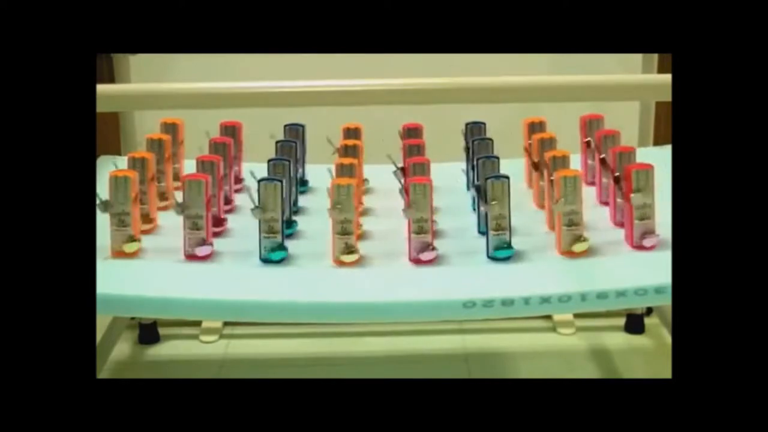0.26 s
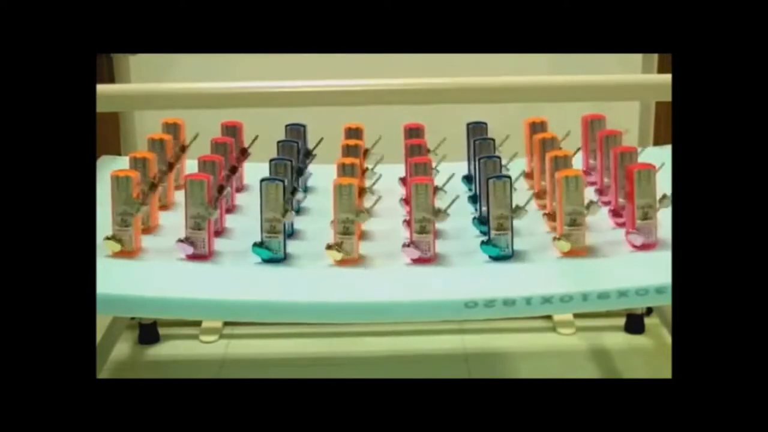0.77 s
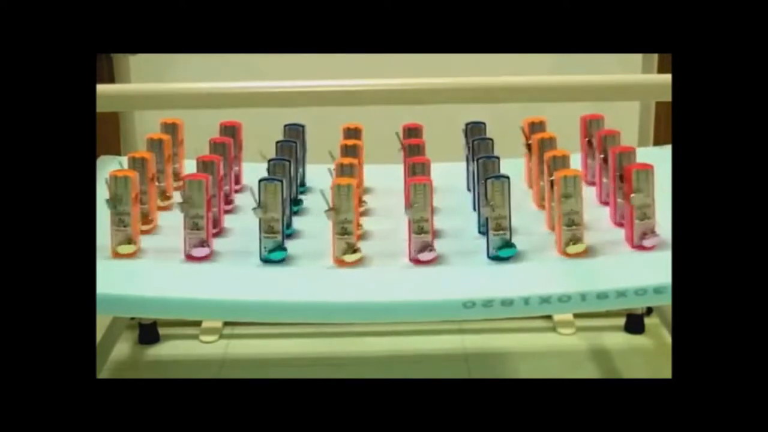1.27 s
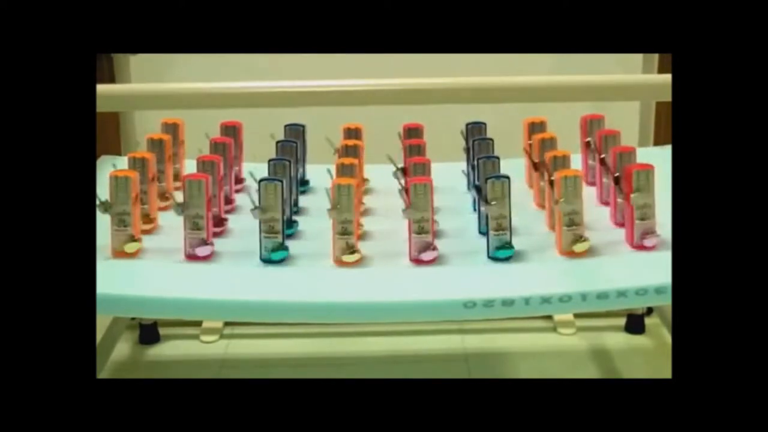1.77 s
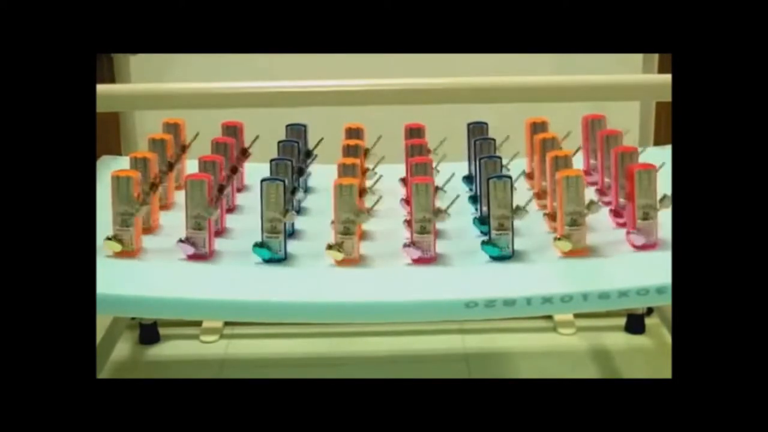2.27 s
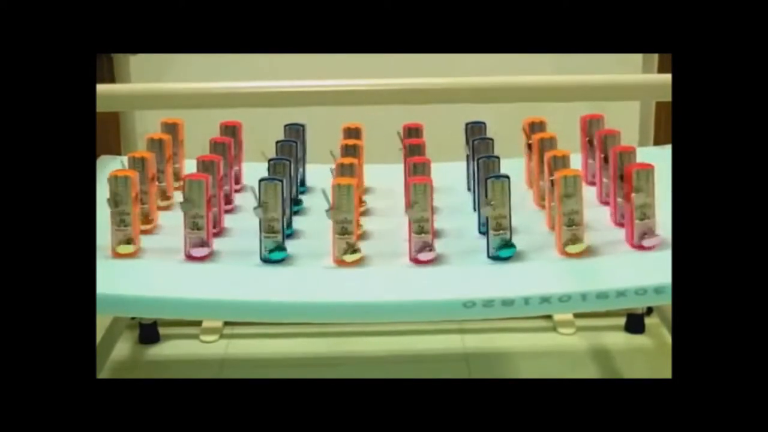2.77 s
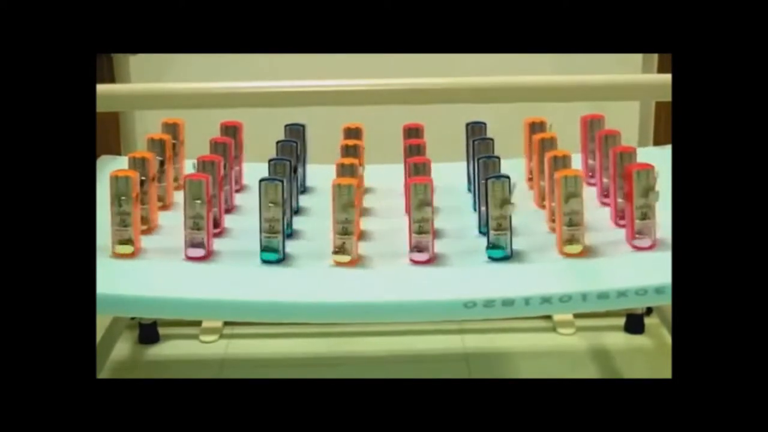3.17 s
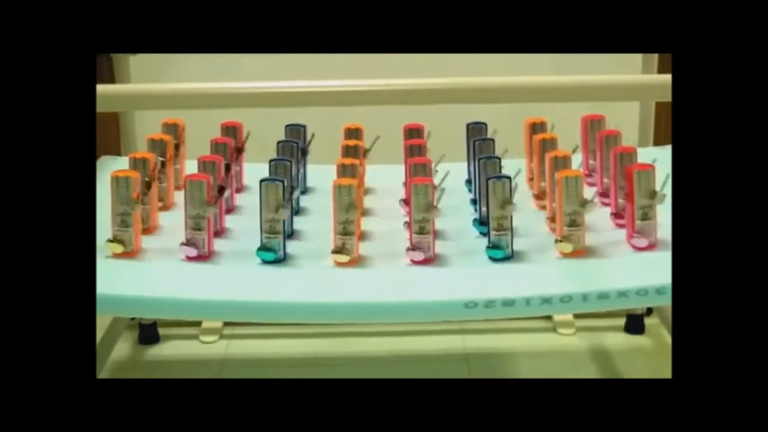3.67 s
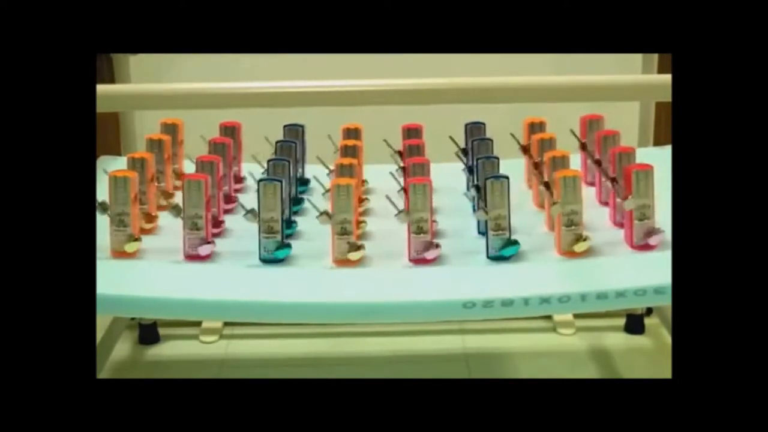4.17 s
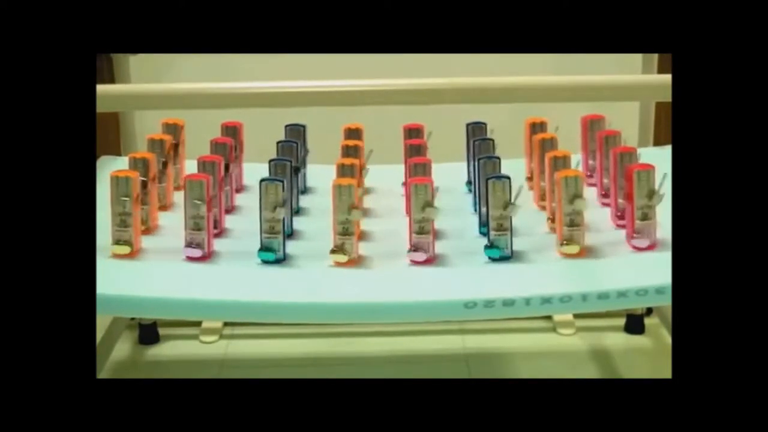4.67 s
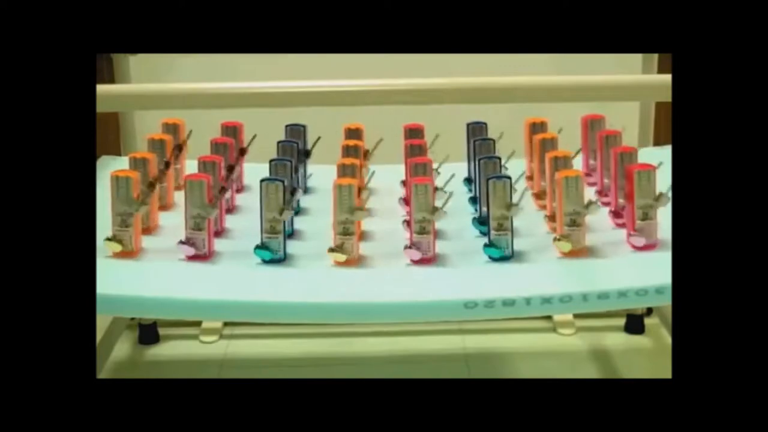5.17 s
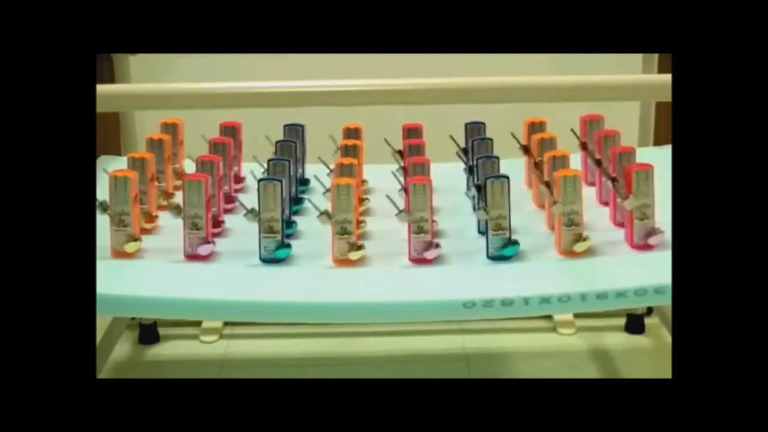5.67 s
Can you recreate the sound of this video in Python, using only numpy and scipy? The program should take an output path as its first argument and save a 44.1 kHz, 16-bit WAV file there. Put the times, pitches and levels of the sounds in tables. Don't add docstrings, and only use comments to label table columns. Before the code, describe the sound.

The tail of an earlier beat and quiet room hiss open the sound, then at about 0.08 seconds a dry crack leads a dense burst of plastic ticking. Thirty-two metronomes follow one another within roughly a tenth of a second, like a handful of hard pellets rattling. The next burst comes near 0.44, then 0.83 and 1.19, continuing evenly about every 0.37 seconds to the end near 6 seconds. Outward swings start with a clearer snap; return swings begin more softly and spread slightly later. Each burst mixes bright crackle, hollow nasal case ringing around 1.9 kHz, a light board thump and low hum from the supports. Small-room reverberation fills the gaps without quite dying away. Faint stray ticks appear near 0.6, 2.7, 3.4 and 4.4 seconds. The camera microphone sound is moderately wide, with dulled top end and slightly grainy, smeared attacks.

```python
import sys
import numpy as np
from scipy import signal
from scipy.io import wavfile

SR = 44100
rng = np.random.default_rng(int(sys.argv[2]) if len(sys.argv) > 2 else 0)


def elevation(decibels):
    levels = np.asarray(decibels, float)
    return 10 ** (levels / 20)


def transcribe(signal):
    frames = np.atleast_2d(signal).T
    limited = np.clip(frames, -1, 1)
    pcm = np.round(limited * 32767).astype(np.int16)
    wavfile.write(sys.argv[1], SR, pcm)


N = 261513
LEAD = 22050


def evened(x):
    return x / np.sqrt(np.mean(x ** 2) + 1e-20)


def read(points, hz):
    f, value = np.transpose(points)
    return np.interp(np.log(hz + 1), np.log(f + 1), value)


def colour(x, points):
    log_gain = np.log(elevation(read(points, abs(np.fft.fftfreq(4096, 1 / SR)))))
    taps = np.fft.ifft(np.exp(np.conj(signal.hilbert(log_gain)))).real[:2048]
    taps = taps.reshape((1,) * (x.ndim - 1) + (-1,))
    return signal.oaconvolve(x, taps, axes=-1)[..., :x.shape[-1]]


# f/Hz, level per Hz/dB
AIR_COLOUR = [(20, -14), (50, -10), (90, -14.5), (140, -9), (300, -10), (450, -6), (1700, -14), (1870, 1.5),
              (2080, -9), (8000, -20), (11300, -33), (12500, -96.5)]


def air():
    return elevation(-44) * evened(colour(rng.standard_normal((2, N)), AIR_COLOUR))


def swings(leads, followers, rear, hollow_db):
    rear_units = 12
    wobble_ms, uneven_db, uneven_hollow_db = 1.2, 1.5, 1.5
    s, lead_db, spread, crowd_db, crowd_ring_db = np.transpose(leads)[:, :, None]
    first_ms, last_ms, rear_db, rear_ring_db = rear
    slot = (np.arange(rear_units) + rng.random(rear_units)) / rear_units
    hidden = [(first_ms + (last_ms - first_ms) * u, 0, rear_db, rear_ring_db) for u in slot]
    lag_ms, drift, db, ring_db = np.transpose(followers + hidden)
    a, b, c = rng.standard_normal((3, len(leads), len(db)))
    late = (spread * (lag_ms + drift * (s - N / SR / 2)) + wobble_ms * a) / 1000
    crowd_level = db + crowd_db + uneven_db * b
    crowd_hollow = ring_db + crowd_ring_db + uneven_hollow_db * c
    crowd = np.reshape([s + late, crowd_level, crowd_hollow], (3, -1)).T
    leader = np.hstack([s, lead_db, 0 * s + hollow_db])
    return np.vstack([leader, crowd])


# t/s, crack level/dB, crowd's lag stretch (1 = usual),
# crowd level/dB, crowd's hollow ring/dB
LEADS_OUT = [
    (0.0826, -9.5, 1.055, .1, -3),
    (0.8318, -7, 1.055, -1.5, 0.4),
    (1.579, -9, 1.005, -0.75, -0.3),
    (2.3272, -7.5, 1.046, -0.9, -1.5),
    (3.0756, -7, 0.99, -1, 0.4),
    (3.8228, -9, 1.01, -1.15, -0.1),
    (4.5707, -10.5, 1.04, -1.1, -0.3),
    (5.3181, -9.5, 1.044, -1.05, -0.7),
]
LEADS_BACK = [
    (0.437, -10, 0.97, -0.4, 0.2),
    (1.1866, -10, 0.97, -0.6, 0.6),
    (1.9351, -12, 0.93, 0, -0.5),
    (2.6825, -13.5, 0.96, -0.5, -0.5),
    (3.4284, -13, 1.025, -0.5, -1.3),
    (4.1758, -10.5, .99, -0.5, -1),
    (4.9248, -10.5, .99, -0.9, 0.5),
    (5.6738, -11.5, 0.99, -0.7, -0.4),
]
# lag/ms, lag drift/(ms per s), crack level/dB, hollow ring over crack/dB
CROWD_OUT = [(6.514, -0.54, -9.5, -8), (17.35, -.5, -10.5, 1), (20.77, -.3, -26.5, 22),
             (26.17, -.3, -12.5, -1.5), (33.1, -.2, -10, -11.5), (41, .3, -16.5, 1), (45.9, -.1, -11, 8),
             (52.2, -.1, -15, 6.5), (58.14, 0.061, -22, 12.5), (63.4, .2, -12, 4), (69.5, -.1, -21, 3.5),
             (74.85, -0.14, -15, -1.5), (88, -0.59, -24, -2), (96, .3, -19, -3.5), (103, -0.36, -20.5, 7),
             (112, -.1, -25.5, -3), (121.7, -0.057, -28.5, -12), (131, -.1, -32, 1.5),
             (146, 0.14, -39.5, -12)]
CROWD_BACK = [(11.6, -.5, -21.5, 1.5), (19.45, -.2, -12.5, -2), (26.44, -.3, -14, 0), (33.38, .1, -8.5, -6),
              (38.8, -.2, -12, 2), (49.4, 0.26, -15, 7), (55.6, .5, -13, 3.5), (62.14, -.1, -13.5, -1),
              (71.3, .1, -13.5, 6), (78, 0.11, -17, 1), (85.4, -0.15, -13, 5), (90.2, .1, -19, -1.5),
              (96, 0.0052, -12, 1), (103, -.1, -22.5, 9.5), (109, -0.53, -23.5, -8.5), (118, 0.27, -32, -3),
              (131.5, 0.21, -27, -24), (149, 0.037, -36, -2.5), (152, 0.21, -38, -1.5)]
# first lag/ms, last lag/ms, crack level/dB, hollow ring/dB
REAR_ROWS_OUT = (10, 82, -18.5, 2)
REAR_ROWS_BACK = (24, 108, -18.5, 2.5)
# out/dB, back/dB
LEADER_HOLLOW = (-1.6, -7.5)
# t/s, crack level/dB, hollow ring over crack/dB
STRAY_TICKS = [
    (2.672, -27, -4),
    (3.4125, -29, -6),
    (4.396, -34, 0),
    (.606, -32, 0),
]


def all_ticks():
    cycle_s = 0.749
    out = swings(LEADS_OUT, CROWD_OUT, REAR_ROWS_OUT, LEADER_HOLLOW[0])
    back = swings(LEADS_BACK, CROWD_BACK, REAR_ROWS_BACK, LEADER_HOLLOW[1])
    earlier = back[back[:, 0] < cycle_s] - [cycle_s, 0, 0]
    return np.vstack([out, back, earlier, STRAY_TICKS])


def escapement(t, leading):
    grains = elevation(2.2 * rng.standard_normal(len(t) // 10).repeat(10))
    rattle_db = -6 - 4 * leading
    snap = elevation(-0.5 - 60 * t / 0.0052)
    tail = elevation(-60 * t / 0.027)
    rattle = elevation(rattle_db - 60 * t / 0.16)
    rise = np.minimum(t / 0.0009, 1)
    return rng.standard_normal(len(t)) * grains * (snap + tail + rattle) * rise


def ring(modes, t, detune, vary_db, rise):
    hz, db, t60 = np.transpose(modes)[:, :, None]
    a, b, phase = rng.standard_normal((3, len(modes), 1))
    level = elevation(db + vary_db * b - 60 * t / t60)
    waves = level * np.sin(2 * np.pi * hz * (1 + detune * a) * t + phase)
    return waves.sum(0) * (1 - np.exp(-t / rise))


# f/Hz, level/dB, t60/s
CASE_WALLS = [(2675, 0, 0.037), (2995, 0, 0.032), (3903, -0.5, 0.029), (5160, -25, 0.0033),
              (5796, -1, 0.036), (7100, -5.5, 0.0023), (8300, -47, 0.0021)]
# f/Hz, level/dB, t60/s
CASE_HOLLOW = [(1828, -2.5, 0.023), (1921, 1.5, 0.031), (1844.5, -8, 0.08), (2056, -3, 0.022),
               (2143, 3, 0.0032), (1580, -14.5, 0.025)]


def plastic_case(t, db, hollow_db):
    walls = elevation(db - 13.5) * ring(CASE_WALLS, t, detune=0.033, vary_db=5.5, rise=0.00026)
    hollow = elevation(db + hollow_db - 5.0) * ring(CASE_HOLLOW, t, detune=0.01, vary_db=1.5, rise=0.00071)
    return walls + hollow


# f/Hz, level/dB, t60/s
BOARD_MODES = [(370.2, 0, 0.079), (416.7, 0.5, 0.11), (484.4, 4, 0.086), (582.5, 5, 0.068),
               (693.4, 8.5, 0.049), (902, 5, 0.031), (1130, 14, 0.011)]


def board_thump(t, db):
    return elevation(0.25 * db - 32.0) * ring(BOARD_MODES, t, detune=0.051, vary_db=3.5, rise=0.0063)


# f/Hz, level/dB
CRACK_TONE = [(150, -42.5), (300, -40), (600, -12), (1200, -10), (2300, -1.5), (3900, -2), (5500, -6),
              (8400, -9), (11300, -20.5), (12200, -52.5)]


def metronomes():
    crack, case, board = np.zeros((3, 2, N + LEAD + SR))
    t, slow = np.arange(1500) / SR, np.arange(3000) / SR
    leaders = [row[0] for row in LEADS_OUT + LEADS_BACK]
    for s, db, hollow_db in all_ticks():
        k = round(s * SR) + LEAD
        place = np.array([[1], [2 * rng.random() - 1]])
        crack[:, k:k + len(t)] += place * elevation(db) * escapement(t, s in leaders)
        case[:, k:k + len(t)] += place * plastic_case(t, db, hollow_db)
        board[:, k:k + len(slow)] += place * board_thump(slow, db)
    return (elevation(2.5) * colour(crack, CRACK_TONE) + case + board)[:, :N + LEAD]


# f/Hz, level/dB, t60/s
SUPPORT_MODES = [(209, 0, .55), (224, -6, .4), (155, -4, .25)]


def supports(x):
    hz, db, t60 = np.transpose(SUPPORT_MODES)[:, :, None]
    t = np.arange(SR // 2) / SR
    hum = (elevation(db - 60 * t / t60) * np.sin(2 * np.pi * hz * t)).sum(0)
    return elevation(-45) * signal.fftconvolve(x, hum[None], axes=1)[:, :x.shape[1]]


# f/Hz, t60/s
ROOM_DECAY = [(150, 1), (400, 0.78), (1400, 0.58), (1860, 0.57), (2400, 0.51), (7000, 0.38), (11000, 0.37)]


def room(x):
    n, out = x.size, np.zeros((2, x.size))
    for turn in range(3):
        taps = np.zeros((2, SR))
        at = np.arange(200, SR - 20, 20) + rng.integers(0, 20, (2, (SR - 201) // 20))
        np.put_along_axis(taps, at, rng.choice([-1., 1.], at.shape), 1)
        hz, t, z = signal.stft(taps, SR, nperseg=256)
        decay = elevation(-60 * t / read(ROOM_DECAY, hz)[:, None])
        tail = signal.istft(z * decay, SR, nperseg=256)[1]
        tail = tail / np.linalg.norm(tail[0])
        share = np.sqrt(2 / 3) * np.cos(np.pi * (np.arange(n) / SR / 1.1 + turn / 3))
        out += signal.fftconvolve(share[None] * x, tail, axes=1)[:, :n]
    return out


# f/Hz, level/dB
WIDTH = [(100, -6.5), (400, -14), (1200, -13), (2500, -8), (5000, -1.5), (10000, 1)]


def scene():
    direct = metronomes()
    direct = direct + supports(direct)
    ticks = direct * elevation([[0], [.5]]) + elevation(-9) * room(direct[0])
    both = ticks[:, LEAD:] + air()
    mid, side = both[0], colour(both[1], WIDTH)
    return np.array([0.91 * mid + side, mid - side])


def gap(x):
    notch = signal.butter(3, [7770, 8030], "band", fs=SR, output="sos")
    return x - .68 * signal.sosfiltfilt(notch, x)


# f/Hz, level/dB
ROUNDING_GRIT = [(300, -22), (1900, -17), (4000, -12), (9000, -10), (12000, -14)]
# f/Hz, level/dB
LEAST_KEPT = [(300, -67), (3000, -68), (6000, -50), (9000, -47), (12000, -51)]
# f/Hz, level/dB
SIDE_LIMIT = [(150, -6), (500, -11), (1100, -30.5), (1550, -25), (1900, -10), (2400, -28), (3500, -30),
              (5500, -22), (9500, -23), (11500, -35.5)]


def camera_frames(mid, side):
    hz, t, z = signal.stft(np.array([mid, side]), SR, "cosine", nperseg=2048)
    band = np.floor(36 * np.log(1 + hz / 900)).astype(int)
    starts = np.flatnonzero(np.diff(band, prepend=-1))
    width = np.diff(starts, append=len(hz))[:, None]
    power = np.add.reduceat(abs(z) ** 2, starts, axis=1) / width
    level_db = 10 * np.log10(power + 1e-20)
    loud_db = 10 * np.log10((abs(z[0]) ** 2).sum(0) + 1e-20)
    lately_db = np.append(loud_db[:1], loud_db[:-1])
    fall = 125. * t
    held_db = np.maximum.accumulate(lately_db + fall) - fall
    whim = rng.standard_normal(power.shape)
    whim = evened(whim + np.roll(whim, 1, 2))
    least_mid = held_db + read(LEAST_KEPT, hz[starts])[:, None] + 7.0 * whim[0]
    calm = lately_db + 6.5 * whim[1] < read(SIDE_LIMIT, hz[starts])[:, None]
    kept = np.array([level_db[0] > least_mid, calm & (level_db[1] > least_mid - 7.0)])
    a, b = rng.standard_normal((2,) + z.shape)
    grit = (a + 1j * b) * elevation(level_db[:, band] + read(ROUNDING_GRIT, hz)[:, None])
    return signal.istft((z + grit) * kept[:, band], SR, "cosine", nperseg=2048)[1][:, :N]


def band_limit(x):
    return signal.sosfilt(signal.butter(12, 12800, fs=SR, output="sos"), x)


def record(dry):
    x = np.tanh(dry)
    x = signal.sosfilt(signal.butter(2, 75, "high", fs=SR, output="sos"), x)
    lowpass = signal.firwin(511, 11700, window=("kaiser", 8), fs=SR)
    x = gap(signal.oaconvolve(x, lowpass[None], "same"))
    mid, side = gap(camera_frames((x[0] + x[1]) / 2, (x[0] - x[1]) / 2))
    return band_limit(np.array([mid + side, mid - side]))


dry = scene()
out = record(dry)
transcribe(out)
```